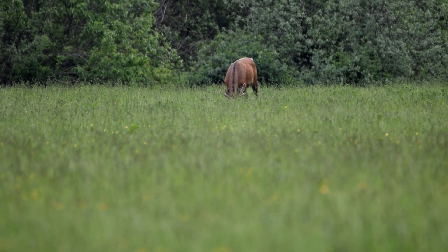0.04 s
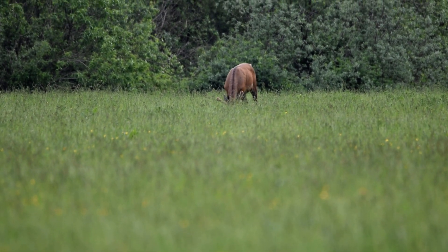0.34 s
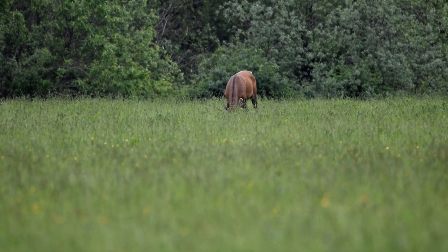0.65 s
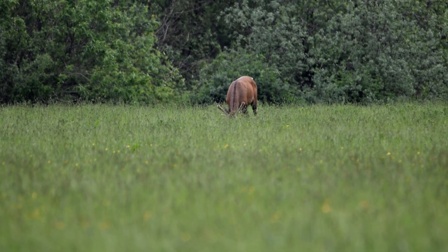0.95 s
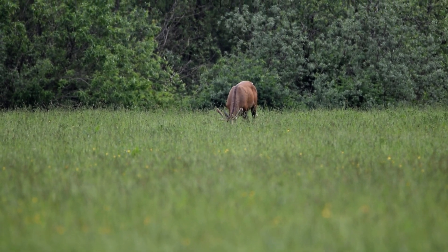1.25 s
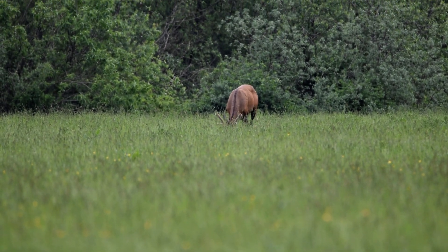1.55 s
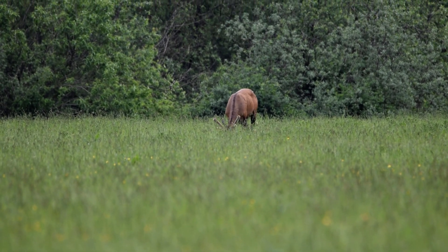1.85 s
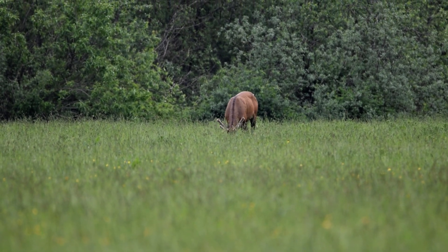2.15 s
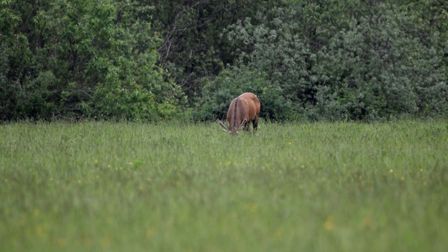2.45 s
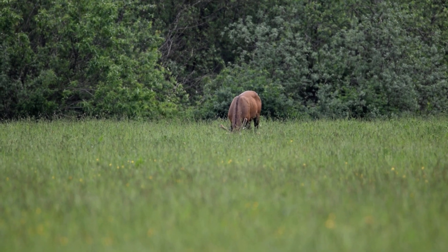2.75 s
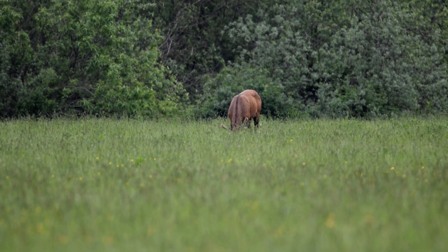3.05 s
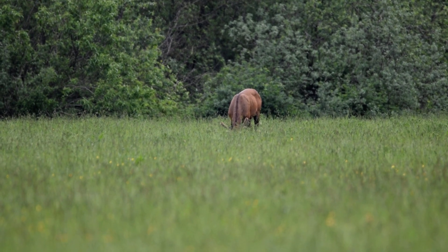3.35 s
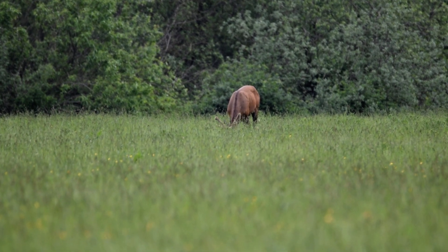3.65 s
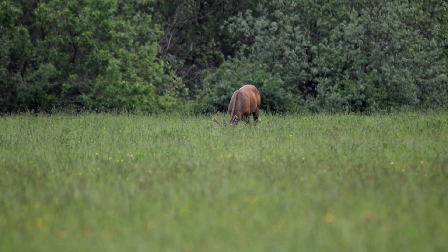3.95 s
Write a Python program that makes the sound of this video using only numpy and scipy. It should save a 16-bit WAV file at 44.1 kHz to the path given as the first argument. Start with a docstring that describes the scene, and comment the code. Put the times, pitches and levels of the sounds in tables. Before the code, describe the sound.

A low, even outdoor rush and rumble, with thin bird whistles and sharp, close handling clicks.

```python
"""A steady, far rush of wind or traffic across a meadow, over a low rumble and a faint hiss of leaves.
From the trees at the edge of the wood small birds give thin, high whistles, some of them trilled,
which trunks and foliage scatter into a short tail. Midway, right beside the microphone, the camera
is handled: its housing clicks, rings and rattles a few times, and the last click is the loudest."""
import sys
import numpy as np
from scipy import signal
from scipy.fft import rfft, irfft
from scipy.io import wavfile

SR = 44100
rng = np.random.default_rng(int(sys.argv[2]) if len(sys.argv) > 2 else 0)


def to_wav(sig):
    """Store sig (one row per channel, or 1-D mono) as 16-bit WAV at the path in sys.argv[1].

    Samples outside -1..1 are clipped; the rate is SR.
    """
    pcm = np.clip(np.atleast_2d(sig), -1, 1) * 32767
    pcm = np.round(pcm).astype(np.int16)
    wavfile.write(sys.argv[1], SR, pcm.T)  # frames by channels


N = 176400
T = np.arange(N) / SR


def from_db(db):
    """Decibels to gain."""
    return 10 ** (np.asarray(db) / 20)


def rms_one(x):
    """Scale to rms 1."""
    return x / np.sqrt(np.mean(x ** 2) + 1e-20)


def at_hz(points, hz):
    """Read a table on a log-frequency axis."""
    points_hz, values = np.transpose(points)
    return np.interp(np.log(np.maximum(hz, 1)), np.log(points_hz), values)


def drift(rate_hz):
    """A smooth random wander of rms 1, mostly slower than rate_hz."""
    pole = np.exp(-2 * np.pi * rate_hz / SR)
    return rms_one(signal.lfilter([1], [1, -2 * pole, pole * pole], rng.standard_normal(N + SR))[SR:])


def band_noise(shape, low_hz, high_hz):
    """Band-passed noise of rms 1."""
    band = signal.butter(2, [low_hz, high_hz], "band", fs=SR, output="sos")
    return rms_one(signal.sosfilt(band, rng.standard_normal(shape)))


def air(colour, levels, waver_db, waver_hz):
    """Open-air noise, near mono in the bass and wide in the treble, wavering about its level."""
    # How alike the two sides of the microphone are: frequency_hz, correlation
    likeness = [(60, 0.99), (130, 0.99), (260, 0.93), (500, 0.84), (900, 0.94), (1700, 0.96), (3000, 0.59),
                (6000, 0.23), (12000, 0.074)]
    hz = np.fft.rfftfreq(N, 1 / SR)
    top_hz = 2 * colour[-1][0]
    gain = from_db(at_hz(colour, hz)) / np.sqrt(1 + (hz / top_hz) ** 4) * hz / (hz + 10)
    alike = at_hz(likeness, hz)
    mid, side = irfft(rfft(rng.standard_normal((2, N))) * gain * np.sqrt([1 + alike, 1 - alike]), N)
    level_db = np.interp(T, *np.transpose(levels)) + waver_db * drift(waver_hz)
    return rms_one(np.array([mid + side, mid - side])) * from_db(level_db)


def far_rush():
    """Wind or traffic a long way off: midrange noise that lifts a little towards the end."""
    # Spectrum of the rush: frequency_hz, relative_db
    colour = [(250, -32.5), (420, -13.5), (560, -8.5), (690, -3), (810, -1), (950, -4.5), (1200, -4),
              (1550, -0.5), (1800, -3), (2200, -8.5), (2800, -15.5), (3600, -34), (6000, -40)]
    # Its level at the microphone: time_s, level_db
    levels = [(0, -49.5), (.85, -49), (1.5, -50), (2.0, -50.5), (2.3, -50.5), (2.75, -48), (3.05, -48),
              (3.45, -48.5), (3.62, -46), (3.72, -47.5), (4, -45.5)]
    return air(colour, levels, waver_db=0.43, waver_hz=3.6)


def low_rumble():
    """A quiet, even bed of bass noise under the rush."""
    # Spectrum of the rumble: frequency_hz, relative_db
    colour = [(20, -30), (32, -43), (50, -13.5), (80, -2.5), (130, 0), (180, -2), (240, 0), (320, -1.5),
              (420, -12), (600, -12.5)]
    # Its level at the microphone: time_s, level_db
    levels = [(0, -61), (.85, -60), (1.6, -61.5), (2.2, -62), (2.8, -60), (3.3, -60), (4, -59)]
    return air(colour, levels, waver_db=0.5, waver_hz=3.7)


def leaves():
    """Foliage at the edge of the wood: a faint, wide hiss."""
    # Spectrum of the hiss: frequency_hz, relative_db
    colour = [(1800, -13.5), (3000, 3.5), (4200, -0.5), (5500, -4), (7000, -9), (9000, -12), (12000, -17),
              (16000, -23.5)]
    # Its level at the microphone: time_s, level_db
    levels = [(0, -64.5), (1.0, -64.5), (2.0, -63), (2.7, -63), (3.4, -61.5), (4, -62.5)]
    return air(colour, levels, waver_db=0.95, waver_hz=6.6)


def birds(trill_hz=55):
    """Thin whistles from the trees glide along an arc, flutter, swell and fade; some pulse in a trill."""
    # Bird notes: start_s, length_s, first_hz, middle_hz, last_hz, level_db, flutter_hz, trill_depth
    notes = [(0.09, 0.27, 8920, 8880, 8700, -76, 25, 0), (0.234, 0.22, 8800, 8720, 8400, -70.5, 45, 0.2),
             (0.411, 0.15, 8460, 8380, 8130, -70, 130, .5), (0.565, 0.057, 8450, 8170, 8120, -71, 70, .3),
             (.665, 0.06, 5450, 5200, 4900, -71, 210, 0), (0.7, 0.023, 4920, 5040, 5250, -64, 32, 0),
             (0.763, 0.055, 5350, 5100, 4850, -69, 200, 0), (0.786, .035, 4820, 5070, 5200, -65, 30, 0),
             (0.85, .31, 6200, 6470, 6500, -73.5, 220, 0.1),
             (1.135, 0.115, 6870, 6450, 5900, -72.5, 240, 0), (1.21, .15, 6000, 5500, 5200, -75, 200, 0),
             (1.327, .05, 8550, 7720, 7440, -68, 60, 0), (1.332, 0.066, 2334, 2412, 2460, -61.5, 13, 0),
             (1.437, 0.1, 4600, 4380, 4470, -65.5, 70, .9), (1.532, 0.11, 4470, 4520, 4550, -69.5, 90, .7),
             (1.56, .2, 5400, 5200, 4900, -77, 260, .5), (2.334, 0.07, 3720, 3700, 3900, -66, 210, 0.2),
             (2.655, 0.045, 3200, 3320, 3550, -61, 140, 0.2), (3.83, 0.056, 2800, 2930, 2800, -62.5, 25, 0),
             (3.902, .05, 4950, 4720, 5000, -75, 60, 0), (3.943, .037, 5050, 5920, 5200, -66.5, 90, 0)]
    calls = np.zeros(N)
    for start_s, length_s, first_hz, middle_hz, last_hz, level_db, flutter_hz, trill_depth in notes:
        progress = np.clip((T - start_s) / length_s, 0, 1)
        arc = np.polyfit([0, .5, 1], [first_hz, middle_hz, last_hz], 2)
        pitch_hz = np.polyval(arc, progress) + flutter_hz * drift(rate_hz=467)
        whistle = np.sqrt(2) * np.sin(2 * np.pi * np.cumsum(pitch_hz) / SR)
        swell = np.abs(np.sin(np.pi * progress)) ** 0.44   # starts quickly and holds evenly
        pulses = 1 - trill_depth * np.cos(np.pi * trill_hz * (T - start_s)) ** 2
        calls += from_db(level_db) * swell * pulses * whistle
    waver_db = 0.8 * drift(rate_hz=57)   # the calls waver on their way through the air
    return calls * from_db(waver_db)


def wood(calls, gain_db=-3, t60_s=0.2):
    """Trunks and foliage scatter a diffuse tail, different on each side of the microphone."""
    tail = rng.standard_normal((2, SR)) * from_db(-60 * T[:SR] / t60_s)
    response = from_db(gain_db) * rms_one(tail) / np.sqrt(SR)
    return signal.fftconvolve(calls[None], response, axes=1)[:, :N]


def housing_clicks():
    """Close to the microphone each contact cracks, rattles and rings the camera housing's damped modes."""
    # Contacts, each coloured by the spot that is touched:
    # start_s, gain_db, left_minus_right_db, body_db, treble_db, pitch_ratio, left_lag_ms
    contacts = [(1.267, -39.5, -1, 14.5, 2.5, 1.02, 0.0028), (1.373, -54, 0, 8, 2, 0.96, 0.0094),
                (1.5495, -41.5, 2, 15.5, -6, 1.01, 0), (1.75, -47.5, 3, 13, -6, 1.02, 0),
                (2.0929, -38, -5, 7, -4.5, 1.08, 0.017), (2.0964, -42, -10, 2, -7, 1.05, 0.028),
                (2.175, -26.5, -1.5, 4, 4, 0.98, 0.016), (2.1764, -33.5, -4, 6, -6, 1.2, 0.016),
                (2.2570, -42.5, -1, 3, -9, 0.92, 0), (2.531, -45, -3, 4, -6, 0.87, 0),
                (2.5437, -37, -2, 5, -8, 0.97, 0), (2.5877, -17, -7, -2.5, -2, 0.99, 0.01)]
    # Modes of the housing: pitch_hz, relative_db, rise_s
    modes = [(2410, -15.5, 0.00074), (2640, -16, 0.0013), (3190, -9.5, 0.00041), (3460, -1, 0.0006),
             (3960, -23, 0.00056), (3660, -32, 0.005), (5420, -17.5, 0.00048), (5760, -15.5, 0.00044),
             (8320, -13, 0.00039), (9300, -16, 0.00033), (10800, -24, 0.00032), (13500, -35, .0002)]
    rattle_db, rattle_rise_s, rattle_t60_s = -10.5, 0.00099, 0.012
    crack_db, crack_t60_s = -16.5, 0.005
    body_below_hz, treble_from_hz, scatter_db = 2900, 4300, 2.5
    detune = 1 + 0.032 * np.array([[-1], [1]])   # the two sides of the housing ring slightly apart
    out, t = np.zeros((2, N + SR)), T[:SR // 10]
    rattle_envelope = from_db(rattle_db - 60 * t / rattle_t60_s) * (1 - np.exp(-t / rattle_rise_s))
    crack_envelope = from_db(crack_db - 60 * t / crack_t60_s)
    for start_s, gain_db, pan_db, body_db, treble_db, pitch_ratio, left_lag_ms in contacts:
        rattle = rattle_envelope * band_noise((2, len(t)), low_hz=2220, high_hz=5360)
        crack = from_db(treble_db) * crack_envelope * band_noise(len(t), low_hz=3200, high_hz=6500)
        age_s = np.maximum(t - np.array([[left_lag_ms], [0]]) / 1000, 0)
        ring = np.zeros((2, len(t)))
        for mode_hz, mode_db, rise_s in modes:
            colour_db = body_db * (mode_hz < body_below_hz) + treble_db * (mode_hz > treble_from_hz)
            strength = from_db(mode_db + colour_db + scatter_db * rng.standard_normal((2, 1)))
            pitch_hz = mode_hz * pitch_ratio * (detune if mode_hz < treble_from_hz else 1)
            envelope = age_s / rise_s * np.exp(1 - age_s / rise_s)
            ring += strength * envelope * np.sin(2 * np.pi * pitch_hz * age_s)
        pan = from_db(np.array([[pan_db], [-pan_db]]) / 2)
        onset = int(start_s * SR)
        out[:, onset:onset + len(t)] += from_db(gain_db) * pan * (crack + rattle + ring)
    return out[:, :N]


def scene():
    """The meadow all around, birds in the trees at centre and clicks beside the microphone."""
    meadow = low_rumble() + far_rush() + leaves()
    calls = birds()
    return meadow + calls + wood(calls) + housing_clicks()


def record(dry):
    """The top of the treble is cut steeply."""
    cutoff_hz = 15800
    return signal.sosfilt(signal.ellip(12, .1, 70, cutoff_hz, fs=SR, output="sos"), dry)


dry = scene()
out = record(dry)
to_wav(out)
```